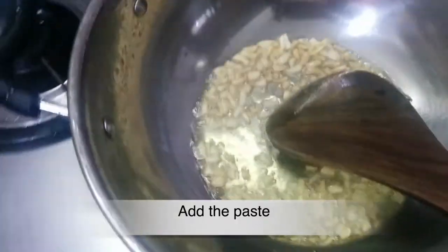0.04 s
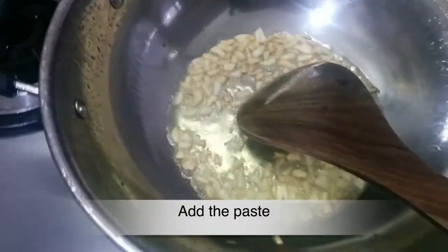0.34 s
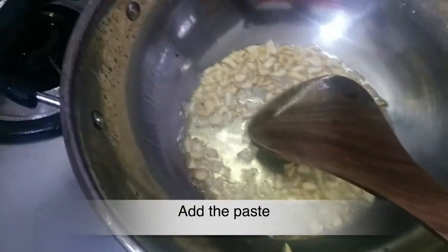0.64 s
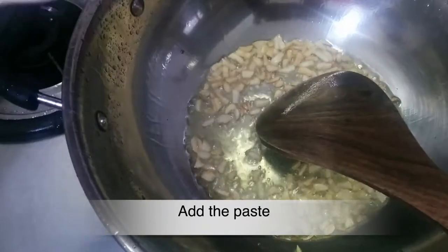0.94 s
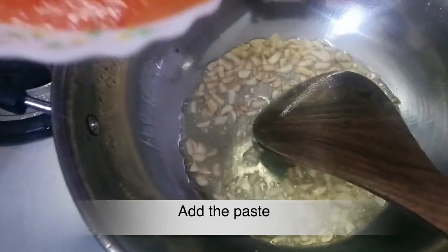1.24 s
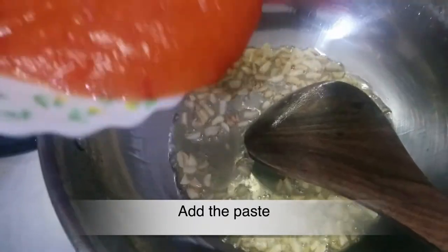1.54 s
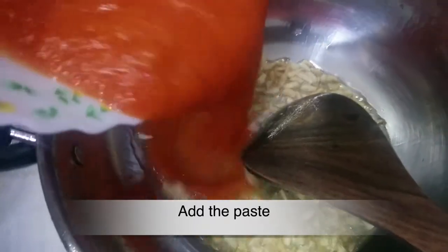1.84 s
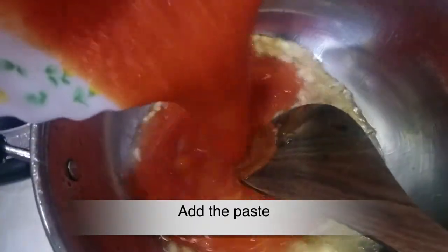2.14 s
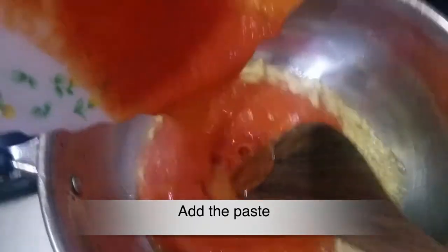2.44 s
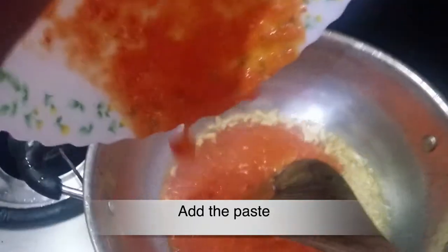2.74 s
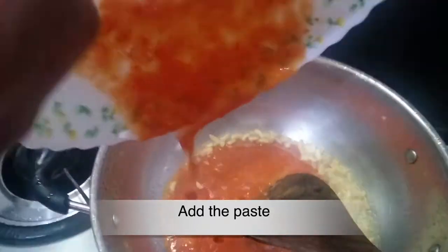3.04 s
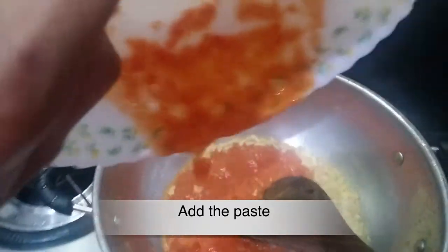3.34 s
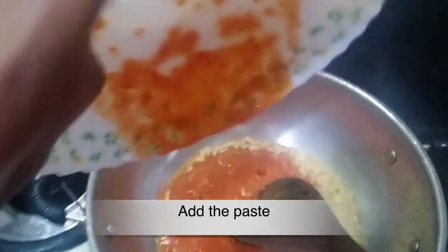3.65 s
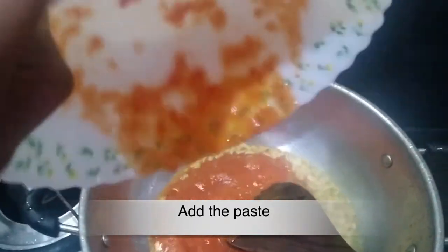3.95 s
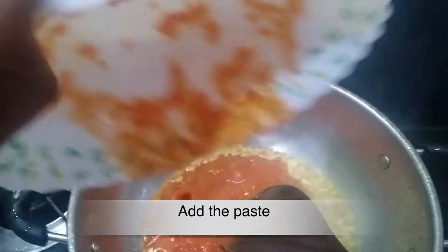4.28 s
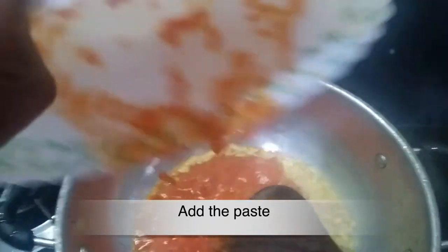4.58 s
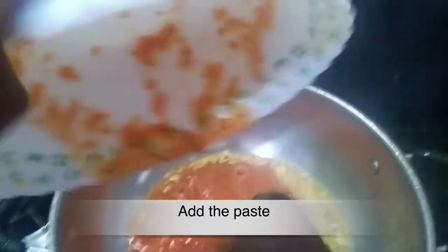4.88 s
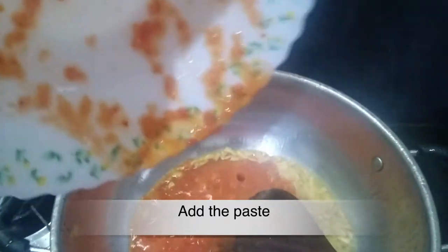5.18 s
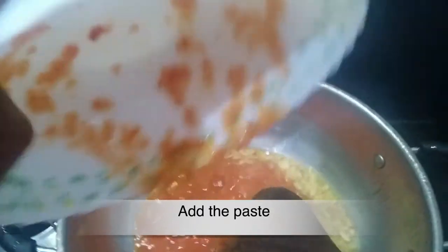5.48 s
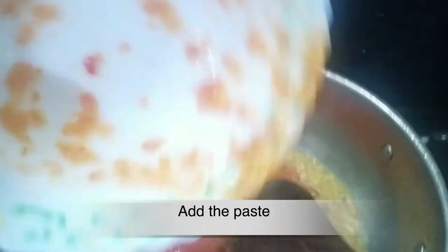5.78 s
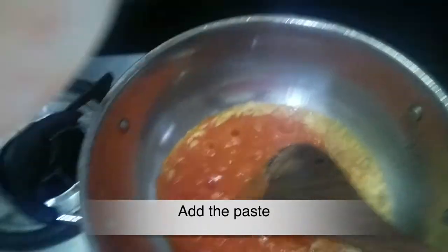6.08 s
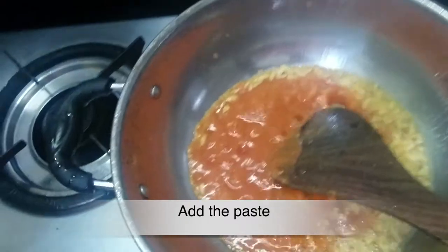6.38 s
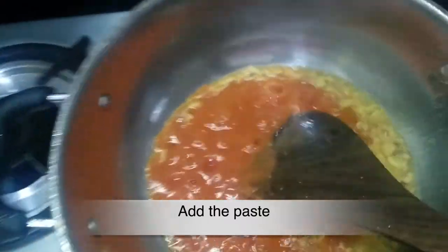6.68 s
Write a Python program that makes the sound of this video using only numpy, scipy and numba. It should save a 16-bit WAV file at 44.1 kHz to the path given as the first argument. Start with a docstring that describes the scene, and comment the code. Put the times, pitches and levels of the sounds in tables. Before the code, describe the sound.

Chopped garlic fries quietly in a steel pan, nudged by a wooden spatula. Wet tomato paste then hits the hot oil with a sudden loud sizzle and a dense boil. The rush gradually thins into separate thick bubbles that pop, gurgle and plop, while the oil keeps spitting fine spray. A few brief steam squeaks and spatula scrapes come through, all heard from close above in a small kitchen.

```python
"""In a small kitchen, chopped garlic fries quietly in a steel pan and a wooden spatula nudges it.
Wet tomato paste is poured into the hot oil: its water flashes to steam with a loud rush, and a dense
boil follows, thinning to separate thick bubbles that pop, gurgle and plop. Steam squeaks through holes
in the paste, and the oily rim keeps spitting fine spray. The hollow of the pan and the room colour
the sound, an appliance hums faintly, and a phone close above holds the peaks down."""
import sys
import numpy as np
from scipy import signal
from scipy.fft import rfft, irfft, next_fast_len
from scipy.io import wavfile
from scipy.ndimage import uniform_filter1d, minimum_filter1d
from numba import njit

SR = 44100
rng = np.random.default_rng(int(sys.argv[2]) if len(sys.argv) > 2 else 0)


def wav_out(sig):
    """Save sig, one row per channel (or a flat mono array), as 16-bit PCM at SR to the path in sys.argv[1]."""
    wavfile.write(sys.argv[1], SR, np.round(np.clip(np.atleast_2d(sig).T, -1, 1) * 32767).astype(np.int16))


N = 300762
T = np.arange(N) / SR
POUR_S = 1.745  # the paste meets the oil

# pitches that the pan and its hollow boost or weaken: pitch_hz, width_hz, lift_db
PAN_RESONANCES = [(210, 36, 8.5), (268, 72, -7.5), (337, 53, 11), (474, 20, 5.5), (620, 130, 4),
                  (856, 66, 3.5), (943, 72, 4), (1830, 37, -2), (2677, 38, 4.5), (2896, 280, 6.5),
                  (3160, 150, -3)]
# tone of small bubbles in the paste: pitch_hz, level_db
SMALL_BUBBLE_TONE = [(700, -42.5), (1200, -7.5), (1450, -3.5), (2000, -1.5), (2400, 2.5), (2900, -3.5),
                     (3250, -1.5), (3850, -4), (4400, -14.5), (5200, -16.5), (7000, -27.5)]


def undb(db):
    """Turn decibels into a gain, a number to multiply a sound by."""
    return 10 ** (np.asarray(db) / 20)


def curves(table):
    """Join a table's timed points with straight lines, one curve for each column after the time."""
    times, *columns = np.transpose(table)
    return [np.interp(T, times, column) for column in columns]


def steady(x):
    """Even out the level to 1 over every tenth of a second; quicker detail stays."""
    return x / np.sqrt(np.maximum(uniform_filter1d(x * x, 4400), 1e-18))


def jitter(samples):
    """A quick random wobble: noise smoothed over so many samples."""
    return steady(uniform_filter1d(rng.standard_normal(N), samples))


def throb(per_s, depth_db):
    """Gain that wanders at random, so many times a second."""
    size = int(SR / per_s)
    walk = uniform_filter1d(uniform_filter1d(rng.standard_normal(N), size), size)
    return undb(depth_db * walk / walk.std())


def swells(table):
    """Gain of short events that swell quickly and fade more slowly."""
    return sum(undb(db) * np.sin(np.pi * np.clip((T - start_s) / length_s, 0, 1) ** 0.49)
               for start_s, length_s, db in table)


def together(*gains):
    """Gain of unrelated sounds heard at once: their powers add."""
    return np.sqrt(sum(gain ** 2 for gain in gains))


def poured(rise_s):
    """Share of the oil that the paste has covered, from 0 to 1."""
    return np.clip((T - POUR_S) / rise_s + .5, 0, 1)


def surge(db, rise_s, until_s, fall_db_per_s, late_s=0):
    """Gain that rises from the pour, holds, then dies down as the oil cools."""
    rise = (1 - np.exp(-np.maximum(T - POUR_S - late_s, 0) / rise_s)) ** 2
    return rise * undb(db - fall_db_per_s * np.maximum(T - until_s, 0))


def simmer():
    """Gain of the slow bubbling that builds up as the paste heats through."""
    # loudness of the simmer: time_s, level_db
    levels = [(3.85, -31), (4.15, -28.5), (4.6, -31), (5.65, -34), (5.78, -36), (6.1, -31.5), (6.5, -32.5),
              (6.8, -28.5)]
    return undb(curves(levels)[0]) * np.clip(T - POUR_S, 0, 1) ** 2


def colour(x, tone, resonances=()):
    """Filter a sound to follow a tone curve, with narrow peaks and dips on top."""
    size = next_fast_len(N + 8192)
    hz = np.maximum(np.fft.rfftfreq(size, 1 / SR), 1)
    tone_hz, tone_db = np.transpose(tone)
    db = np.interp(np.log(hz), np.log(tone_hz), tone_db)
    db += sum(lift / (1 + (2 * (hz - pitch) / width) ** 2) for pitch, width, lift in resonances)
    # folding the cepstrum makes the filter ring after a click, never before it
    cepstrum = irfft(np.log(undb(db)), size)
    cepstrum[1:size // 2] *= 2
    cepstrum[size // 2 + 1:] = 0
    return irfft(rfft(x, size) * np.exp(rfft(cepstrum)), size)[:N]


def echo(x, decay_s, wet_db):
    """Mix in a dense tail of reflections that falls 60 dB in decay_s."""
    tail = rng.standard_normal(N)[:SR // 2] * np.exp(-np.log(1000) * T[:SR // 2] / decay_s)
    wet = signal.fftconvolve(x, tail / np.linalg.norm(tail))[:N]
    return (x + undb(wet_db) * wet) / np.sqrt(1 + undb(wet_db) ** 2)


def crackle(per_s, spread_db):
    """Tiny clicks at random moments, a few much larger than the rest."""
    chance, size = rng.random((2, N))
    signs = rng.choice([-1, 1], N)
    return (chance < per_s / SR) * signs * undb(-spread_db * np.log(np.maximum(size, .002)))


def puffs(clicks, fade_s):
    """Turn every click into a short, soft puff of noise with the same energy."""
    decay = np.exp(-2 / (fade_s * SR))
    power = signal.lfilter([1 - decay], [1, -decay], clicks ** 2 + 1e-18)
    power = uniform_filter1d(power, int(.5 * fade_s * SR) + 1)
    return rng.standard_normal(N) * np.sqrt(np.maximum(power, 0))


def froth(per_s, spread_db, fade_s):
    """Tiny bursts: random puffs of noise at an even overall level."""
    return steady(puffs(crackle(per_s, spread_db), fade_s))


@njit
def ring(times, hz, cycles, sizes, glide):
    """Each bubble in thick liquid swells over some cycles and dies away, its pitch rising a little."""
    out = np.zeros(N)
    for k in range(len(times)):
        start, swell = int(times[k] * SR), cycles[k] * SR / hz[k]
        turn = 2 * np.pi * hz[k] / SR
        wave = sizes[k] * np.e ** 3 + 0j
        step = np.exp(1j * turn - 3 / swell)  # turns and shrinks the wave each sample
        bend = np.exp(1j * turn * glide / swell)
        for i in range(min(int(4.5 * swell), N - start)):
            out[start + i] += wave.imag * (i / swell) ** 3
            wave *= step
            step *= bend
    return out


def bubbles(per_s, low_hz, high_hz, cycles, spread_db, count=55000):
    """A swarm of ringing bubbles of random pitch and size."""
    when, chance, pitch, damping, size = rng.random((count, 5)).T
    alive = chance < (per_s + 0 * T)[(when * N).astype(int)] * N / SR / count
    hz = low_hz + (high_hz - low_hz) * pitch
    sizes = np.sqrt(hz) * undb(-spread_db * np.log(np.maximum(size, .01)))
    swell_cycles = cycles * 2 ** (2 * damping - 1)
    return ring(when[alive] * N / SR, hz[alive], swell_cycles[alive], sizes[alive], glide=0.001)


def kitchen(air_db=-67.5, hum_hz=95):
    """Faint room noise, and the faint hum of an appliance; the hum is heard to dip, return and fade."""
    # tone of the room noise: pitch_hz, level_db
    air_tone = [(25, -10), (60, -17), (110, 7.5), (240, 6), (380, 11), (550, 2), (2500, 3), (5000, -62),
                (15000, -46)]
    # loudness of the hum: time_s, level_db
    hum_levels = [(0, -70), (.27, -70), (.42, -96), (.72, -91), (.85, -74), (1.35, -73), (1.6, -92)]
    air = undb(air_db) * steady(colour(rng.standard_normal(N), air_tone))
    hum = undb(curves(hum_levels)[0]) * np.sqrt(2) * np.sin(2 * np.pi * hum_hz * T)
    return air + hum


def garlic():
    """Oil froths, snaps, sings and hisses round the garlic until the paste smothers it."""
    # loudness of the frying: time_s, fry_db, hiss_db
    levels = [(0, -50.5, -69), (.24, -53.5, -83), (.32, -68, -82), (.45, -63.5, -84), (.69, -58, -79),
              (.86, -52.5, -68.5), (1.0, -53.5, -65), (1.14, -50.5, -60.5), (1.33, -47.5, -58.5),
              (1.54, -48.5, -60), (1.72, -46.5, -64)]
    # tones of the frying and of its fine hiss: pitch_hz, level_db
    fry_tone = [(60, -14), (170, -13), (330, -6), (700, -2), (1200, -5.5), (1600, -3.5), (2200, 6),
                (2650, 3.5), (3050, 0.5), (3450, -1), (4000, -7.5), (4600, -18), (7000, -24), (12000, -27)]
    hiss_tone = [(4000, -46), (5200, -6.5), (6800, -1.5), (10000, -7.5), (15500, -16)]
    # resonances of the nearly empty pan: pitch_hz, width_hz, lift_db
    open_pan = [(1280, 240, 5), (2520, 130, -3), (2630, 190, 5.5), (3330, 160, 1), (4000, 130, 6)]
    # garlic pieces flaring up: start_s, length_s, level_db
    flares = [(.335, 0.025, -61), (.56, 0.02, -54), (.585, 0.11, -50), (.705, 0.067, -50.5),
              (.802, 0.02, -51), (.92, 0.027, -55), (1.085, 0.032, -57), (1.23, 0.025, -47),
              (1.486, 0.017, -46), (1.58, .1, -47.5), (1.725, 0.11, -38)]
    # tiny bubbles that sing as the oil heats: time_s, level_db
    singing_levels = [(.8, -68), (1.15, -54), (1.35, -53), (1.52, -59), (1.63, -53.5), (1.73, -60)]
    fry_db, hiss_db = curves(levels)
    foam = froth(4000, spread_db=2.5, fade_s=.002)
    snaps = undb(-1) * froth(120, spread_db=3, fade_s=.002)
    fry = foam + snaps + steady(bubbles(2400, 200, 5100, cycles=9, spread_db=2.3))
    fry = steady(colour(fry, fry_tone, open_pan))
    fry *= together(undb(fry_db) * throb(per_s=55, depth_db=1.8), swells(flares))
    singing = steady(bubbles(300, 3270, 3630, cycles=12, spread_db=2))
    singing *= undb(curves(singing_levels)[0]) * (T > singing_levels[0][0])
    hiss = steady(colour(crackle(9000, spread_db=1), hiss_tone)) * undb(hiss_db)
    return (fry + singing + hiss) * (1 - poured(rise_s=0.015))


def spatula():
    """Wood sticks and slips over gritty steel in short strokes."""
    # strokes of the spatula: start_s, length_s, level_db
    strokes = [(0.17, 0.13, -41), (0.495, 0.052, -54), (3.634, 0.078, -27.5), (5.82, 0.11, -34.5),
               (6.288, 0.055, -37.5)]
    # tone of wood on steel: pitch_hz, level_db
    scrape_tone = [(60, -20), (150, -17), (280, -9), (430, 1), (700, -7), (1350, 3.5), (1800, 2), (2500, 0),
                   (3300, -25), (5000, -25), (12000, -45)]
    grit = puffs(crackle(900, spread_db=1.5), fade_s=.005)
    return steady(colour(grit, scrape_tone, PAN_RESONANCES)) * swells(strokes)


def pops():
    """Big bubbles burst one by one and ring round the hollow of the pan."""
    # single bubbles, first in the oil, then in the paste: start_s, level_db, pitch_hz
    bursts = [(.513, -46, 1300), (.714, -42, 2600), (.805, -33, 3270), (2.836, -23.5, 673),
              (2.958, -23.5, 800), (3.157, -19, 797), (3.26, -14.5, 1690), (3.453, -25, 1700),
              (3.459, -16.5, 838), (3.454, -21, 1016), (3.463, -16, 2150), (3.481, -14, 2600),
              (3.513, -15, 1440), (3.558, -12.5, 1690), (3.616, -12.5, 2130), (3.725, -10.5, 2640),
              (3.747, -11, 2180), (3.764, -27, 950), (3.808, -19.5, 820), (3.832, -24, 664),
              (3.85, -22, 900), (3.99, -20, 858), (3.866, -13.5, 2070), (4.041, -20, 1720),
              (4.077, -20, 1650), (4.265, -13, 2870), (4.357, -10.5, 2690), (4.674, -12, 2680),
              (4.716, -17, 2800), (4.876, -14.5, 2820), (5.297, -18, 2960), (5.584, -19, 2300),
              (6.052, -12, 2600), (6.149, -19, 3750), (6.234, -20.5, 1296), (6.628, -19, 1910),
              (6.666, -12.5, 2480), (6.698, -13, 2760)]
    start_s, db, hz = np.array(bursts, float).T.copy()
    cycles = np.full(len(hz), 6.)
    return echo(ring(start_s, hz, cycles, undb(db), glide=.006), decay_s=.055, wet_db=-3)


def steam():
    """Water flashes into countless tiny bubbles; the rush sputters and brightens as the paste spreads."""
    # tone of the steam, and the change that dulls its first moments: pitch_hz, level_db
    steam_tone = [(1500, -22), (2500, 11.5), (4000, 13), (5200, 6), (6700, 6.5), (9000, 2.5), (15500, -8.5)]
    flash_tone = [(2200, -3), (3600, -5.5), (6800, 4), (10000, -3.5), (15500, -7)]
    # the first steam rings the still open pan: pitch_hz, width_hz, lift_db
    flash_resonances = [(1650, 500, -2), (2170, 110, 15)]
    sputter = undb(1.3 * jitter(samples=220))
    fizz = colour(steady(crackle(14000, spread_db=4)), steam_tone) * sputter
    dull = colour(fizz, flash_tone, flash_resonances)
    brightening = steady(dull + poured(rise_s=1) ** 4 * (fizz - dull))
    flash = surge(db=-15, rise_s=.015, until_s=1.822, fall_db_per_s=105)
    rush = surge(db=-19.5, rise_s=0.1, until_s=2.76, fall_db_per_s=34)
    return brightening * together(flash, rush)


def spray(pour_db=-24, rest_db=-45.5):
    """Droplets burst in the oil at the rim; each spit starts with a crack and crackles away."""
    # spits of water reaching hot oil: start_s, crack_db, spray_db, fade_s
    spits = [(3.531, -5, -34.5, 0.42), (3.64, -6, -31, 0.45), (3.722, -17, -33, 0.2),
             (3.782, -6, -39, 0.036), (4.019, -11, -32.5, 0.46), (4.192, 1, -33, 0.61),
             (4.358, -13, -34, 0.13), (4.584, 8, -25.5, 0.11), (4.62, -16, -22, 0.035),
             (4.76, -25.5, -26.5, 0.11), (5.062, -4, -36.5, 0.17), (5.241, -6, -31.5, 0.15),
             (5.302, -12, -36, .07), (5.375, -8, -32, 0.042), (5.478, -4, -32.5, 0.082),
             (5.558, -6, -33.5, 0.12), (5.853, -12, -34.5, 0.046), (5.888, 3, -30, 0.17),
             (5.925, -7, -35, .04), (5.99, -18, -37.5, 0.3), (6.148, -8, -32.5, 0.26),
             (6.181, -4, -37, 0.037), (6.209, -1, -35.5, 0.19), (6.318, 2, -30, 0.075),
             (6.488, -6, -37.5, 0.098), (6.702, -1, -32.5, 0.086), (6.78, -15, -33, 0.099)]
    # tone of the spray: pitch_hz, level_db
    spray_tone = [(3000, -23.5), (5200, -10.5), (6200, -4), (9800, 0), (12200, -4.5), (15000, -2.5),
                  (15800, -11.5)]
    # its two bright peaks: pitch_hz, width_hz, lift_db
    peaks = [(10370, 1600, 1.5), (14200, 1500, 0.5)]
    pour_power = surge(db=pour_db, rise_s=0.19, until_s=3.093, fall_db_per_s=35.5) ** 2
    power = pour_power + undb(rest_db) ** 2
    cracks = np.zeros(N)
    for start_s, crack_db, spray_db, fade_s in spits:
        start = int(start_s * SR)
        age = T[:N - start]
        attack_s = .002 / undb(crack_db)  # a softer crack opens more slowly
        burst = (1 - np.exp(-age / attack_s)) * np.exp(-(age / fade_s) ** 1.6)
        power[start:] += (undb(spray_db) * burst) ** 2
        cracks[start] = undb(crack_db)
    drops_per_s = 1900 + 5200 * power / undb(pour_db) ** 2  # a louder spray is a denser one
    drops = crackle(drops_per_s, spread_db=3)
    ticks = undb(-12) * froth(140, spread_db=2, fade_s=.0004)  # larger droplets
    drops = steady(puffs(drops, fade_s=0.00088) + puffs(drops, fade_s=0.012))  # a snap and a hiss
    drops = steady(colour(drops + ticks, spray_tone, peaks))
    cracks = colour(cracks + puffs(cracks, fade_s=.0009), spray_tone, peaks)
    cracks = signal.sosfilt(signal.butter(3, 5500, "highpass", fs=SR, output="sos"), cracks)
    spatter = throb(per_s=68, depth_db=1) ** (1 - pour_power / power)  # the spits come unevenly
    return (drops * spatter * np.sqrt(power) + cracks) * poured(rise_s=0.072)


def boil(roar_per_s=7400, simmer_per_s=1100, cooled_s=2.9, thinning_s=0.3):
    """Steam bubbles through the paste: a roar at first, then fewer bubbles as the oil cools."""
    # tones of the large bubbles and of the glugs: pitch_hz, level_db
    large_tone = [(200, -17), (450, -16), (560, -7.5), (660, 3.5), (850, 4), (1020, 0), (1200, -5.5),
                  (1700, 10)]
    glug_tone = [(25, -11), (55, -20), (85, -2.5), (115, 1.5), (170, -6), (220, 1.5), (400, -1), (520, 3.5),
                 (800, -32), (2000, -58)]
    # thick paste slumping and gulping air: start_s, length_s, level_db
    slumps = [(2.46, 0.17, -39), (3.65, .05, -41), (3.83, 0.087, -53), (4.05, 0.071, -42.5),
              (4.385, .05, -48), (4.53, .04, -56.5), (5.22, .05, -50), (5.84, 0.19, -51), (6.28, 0.19, -45)]
    heat = np.exp(-np.maximum(T - cooled_s, 0) / thinning_s)
    rate = simmer_per_s + (roar_per_s - simmer_per_s) * heat
    simmering = simmer() * throb(per_s=22, depth_db=1)
    bunched_rate = rate * throb(per_s=50, depth_db=3)  # bubbles set each other off

    small = steady(bubbles(bunched_rate, 988, 4700, cycles=13, spread_db=2.5))
    escaping_steam = undb(-4) * froth(bunched_rate, spread_db=2, fade_s=.008)
    small = steady(colour(small + escaping_steam, SMALL_BUBBLE_TONE, PAN_RESONANCES))
    small *= together(surge(db=-19.5, rise_s=0.051, until_s=3.32, fall_db_per_s=45), simmering)

    deep_s = 0.026  # the paste needs a moment to get deep enough for large, low bubbles
    large = bubbles(.6 * bunched_rate, 408.5, 1581, cycles=6.63, spread_db=3.5)
    large = steady(colour(large, large_tone, PAN_RESONANCES))
    large_surge = surge(db=-30.5, rise_s=0.075, until_s=4.05, fall_db_per_s=80, late_s=deep_s)
    large *= together(large_surge, undb(-5) * simmering) * throb(per_s=21, depth_db=0.28)

    # the paste glugs as it closes over the large bubbles
    glugs = puffs(crackle(0.44 * rate, spread_db=1.5), fade_s=0.0015)
    glugs = steady(colour(glugs, glug_tone, PAN_RESONANCES))
    lumpy = throb(per_s=21, depth_db=3.6 - 2 * rate / roar_per_s)
    glug_surge = surge(db=-41, rise_s=0.2, until_s=3.11, fall_db_per_s=10.5, late_s=deep_s)
    glugs *= together(lumpy * together(glug_surge, undb(-27) * simmering), swells(slumps))
    return small + large + glugs


def hollow():
    """Bursting bubbles ring the air between the pan and a tilting plate; pitches stand out in turn."""
    # resonances of that air: pitch_hz, width_hz, level_db, fullest_s, fade_s
    resonances = [(793, 77, -34.5, 2.94, 0.96), (963, 40, -33.5, 3.47, 0.7), (1752, 110, -32, 3.51, 0.41),
                  (2193, 64, -31.5, 3.57, 0.61), (2677, 190, -22, 3.24, 0.47),
                  (2820, 66, -21.5, 3.522, 0.13), (3590, 87, -33, 2.97, 0.18)]
    bursts = puffs(crackle(1700, spread_db=2.5), fade_s=0.015)
    simmering = undb(-19) * simmer()
    out = np.zeros(N)
    for hz, width_hz, db, fullest_s, fade_s in resonances:
        band = signal.iirpeak(hz, hz / (2 * width_hz), fs=SR)
        ringing = steady(signal.lfilter(*band, signal.lfilter(*band, bursts)))
        swell = undb(db) * np.exp(-((T - fullest_s) / fade_s) ** 2)
        out += ringing * together(swell, simmering)
    return out * poured(rise_s=0.21) ** 4


def squeaks():
    """Steam whistles hoarsely through narrow holes in the paste as they open and close."""
    # whistles: start_s, length_s, first_pitch_hz, last_pitch_hz, level_db
    whistles = [(1.853, 0.1, 1224, 1160, -24), (3.26, 0.024, 5200, 5130, -30),
                (3.423, 0.033, 5330, 5500, -31), (3.81, 0.05, 894, 775, -25),
                (5.629, 0.089, 2275, 2680, -27.5), (5.702, 0.04, 3390, 3390, -24.5),
                (5.744, 0.14, 1320, 1345, -34), (5.84, 0.051, 2780, 3070, -26.5),
                (6.149, 0.049, 1695, 1680, -28)]
    waver = 1 + .028 * jitter(samples=110)
    flutter = steady(undb(3 * jitter(samples=260)))
    out = np.zeros(N)
    for start_s, length_s, first_hz, last_hz, db in whistles:
        span = (T >= start_s) & (T < start_s + length_s)
        progress = (T[span] - start_s) / length_s
        hz = (first_hz + (last_hz - first_hz) * progress) * waver[span]
        out[span] += undb(db) * np.sin(np.pi * progress) * np.sin(2 * np.pi * np.cumsum(hz) / SR)
    return out * flutter


def gurgles():
    """A pocket of steam breaks into a wet splutter of bubbles round one pitch."""
    # small bubbles bursting together: start_s, length_s, level_db, pitch_hz
    splutters = [(3.368, 0.067, -24, 1650), (3.55, .11, -26.5, 1690), (3.711, 0.094, -21.5, 2620),
                 (4.04, 0.25, -29.5, 1670), (4.184, 0.067, -31, 2300), (4.343, 0.095, -27.5, 3030),
                 (4.643, 0.11, -32, 2620), (4.817, 0.065, -35, 2470), (4.932, 0.036, -24.5, 2210),
                 (4.949, 0.016, -24, 3860), (4.969, 0.018, -25, 2110), (5.049, 0.028, -26.5, 3000),
                 (5.079, 0.039, -30.5, 3440), (5.219, 0.037, -29, 2200), (5.294, 0.017, -32, 1190),
                 (5.345, 0.063, -27.5, 2080), (5.589, 0.06, -31, 2540), (5.939, 0.05, -29.5, 2560),
                 (6.035, 0.07, -25.5, 2810), (6.102, 0.053, -28.5, 2820), (6.17, 0.056, -30, 2670),
                 (6.236, 0.021, -26, 1490), (6.311, 0.026, -23.5, 1890), (6.32, .04, -26.5, 2700),
                 (6.36, 0.0085, -26, 3680), (6.375, 0.06, -28.5, 2710), (6.535, 0.046, -23, 1950),
                 (6.617, 0.031, -27, 1630), (6.654, 0.021, -32, 2660), (6.747, 0.021, -24, 2160)]
    foam = steady(bubbles(2600, 700, 4400, cycles=12, spread_db=2.5))
    foam += undb(-6) * froth(2000, spread_db=2, fade_s=.005)
    foam = colour(foam, SMALL_BUBBLE_TONE, PAN_RESONANCES)
    out = np.zeros(N)
    for start_s, length_s, db, hz in splutters:
        span = (T >= start_s) & (T < start_s + length_s)
        progress = (T[span] - start_s) / length_s
        burst = signal.lfilter(*signal.iirpeak(hz, Q=3.6, fs=SR), foam[span])
        out[span] += burst / burst.std() * undb(db) * np.sin(np.pi * progress ** 0.56)
    return out


def plops():
    """Each large pocket of steam rings low for a few cycles as it breaks the surface."""
    # pockets heaving the paste: start_s, level_db, pitch_hz
    pockets = [(3.659, -35, 262), (4.029, -37, 212), (4.135, -36.5, 266), (4.48, -47.5, 210),
               (4.851, -45, 336), (5.301, -45, 205), (5.625, -41, 327), (5.85, -35, 268), (5.973, -48, 282),
               (6.323, -44, 257), (6.745, -47, 192)]
    start_s, db, hz = np.array(pockets, float).T.copy()
    cycles = np.full(len(hz), 4.)
    return ring(start_s, hz, cycles, undb(db), glide=.01)


def scene():
    """Everything in the pan, heard close by in a small kitchen."""
    pan = (garlic() + boil() + gurgles() + hollow() + steam()
           + spray() + pops() + plops() + squeaks() + spatula())
    return (echo(pan, decay_s=.18, wet_db=-11) + kitchen())[None]


def record(dry, ceiling=0.5, top_hz=15850):
    """The phone holds the peaks down and cuts the highest treble."""
    gain = np.minimum(1, ceiling / (np.abs(dry) + 1e-9))
    gain = uniform_filter1d(minimum_filter1d(gain, size=90), size=90)
    treble_cut = signal.ellip(10, .2, 80, top_hz, fs=SR, output="sos")
    return signal.sosfilt(treble_cut, dry * gain)


dry = scene()
out = record(dry)
wav_out(out)
```